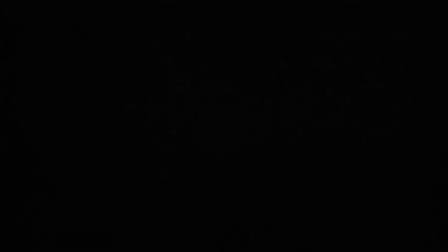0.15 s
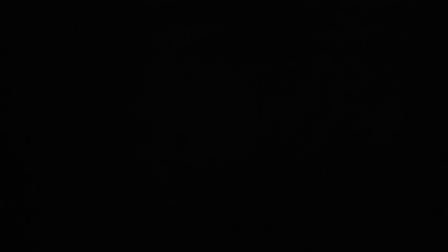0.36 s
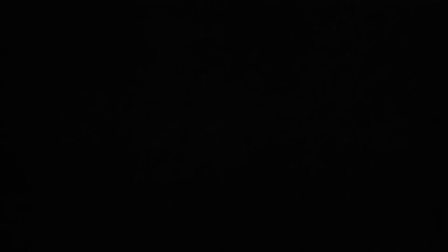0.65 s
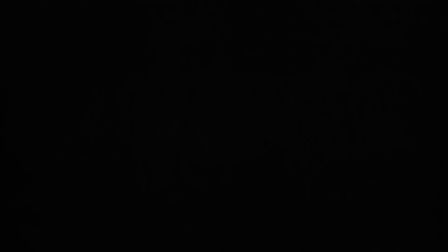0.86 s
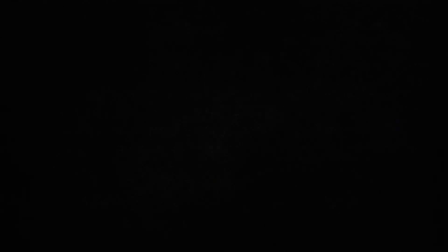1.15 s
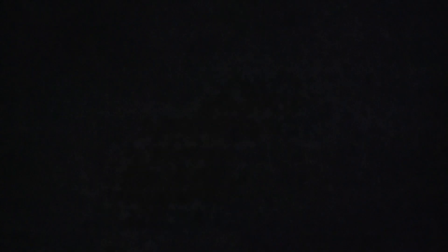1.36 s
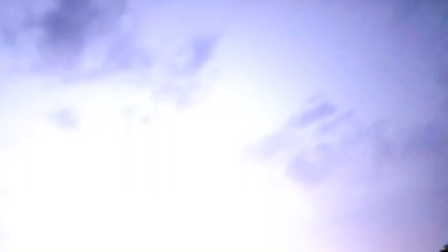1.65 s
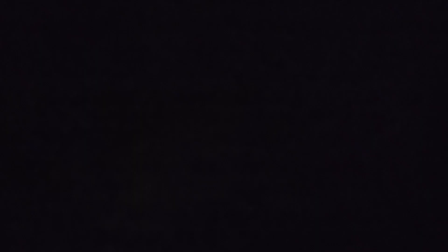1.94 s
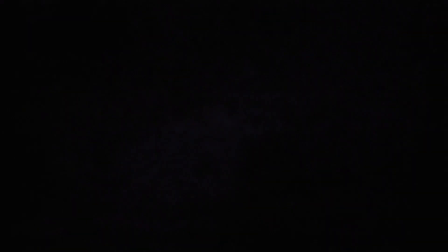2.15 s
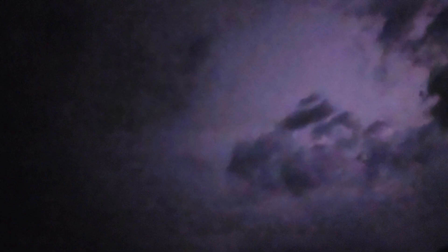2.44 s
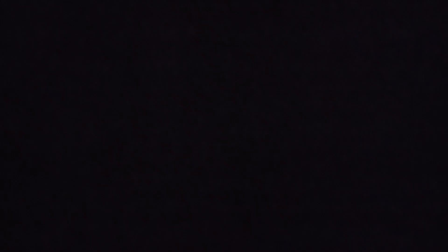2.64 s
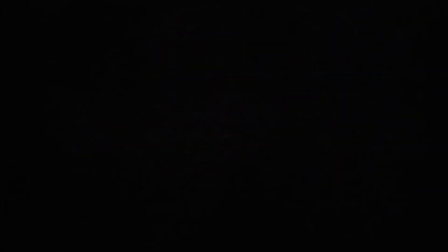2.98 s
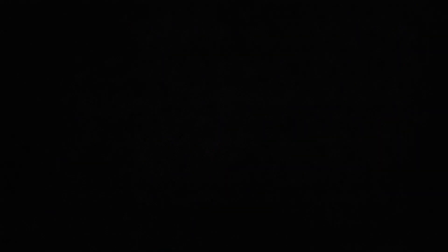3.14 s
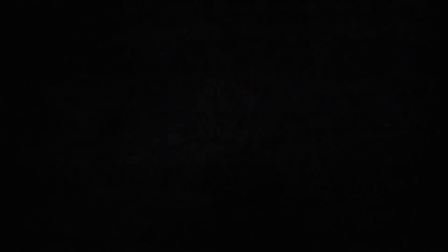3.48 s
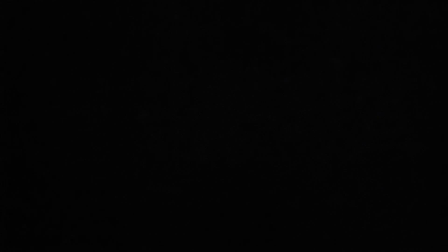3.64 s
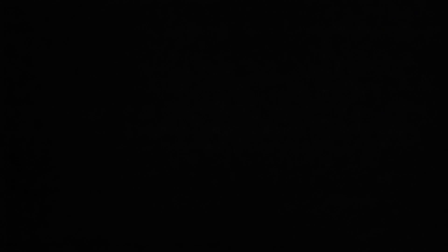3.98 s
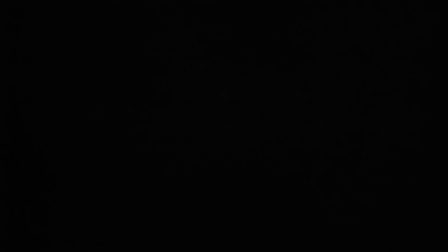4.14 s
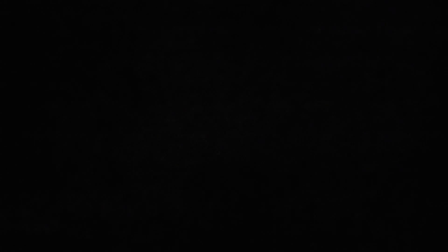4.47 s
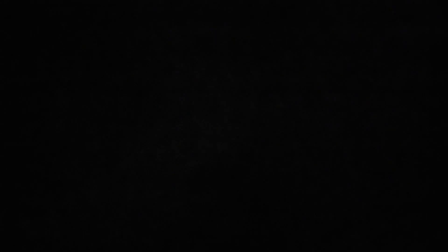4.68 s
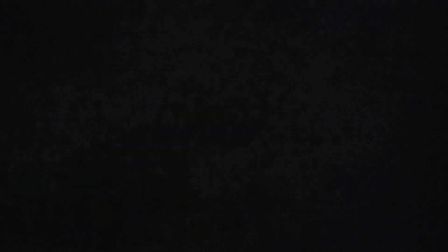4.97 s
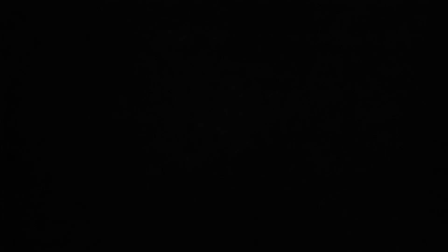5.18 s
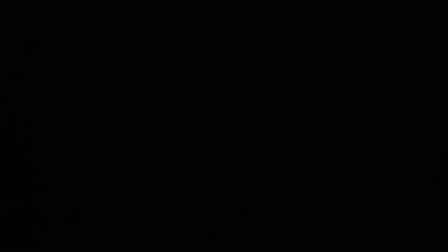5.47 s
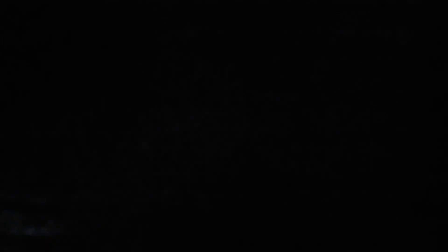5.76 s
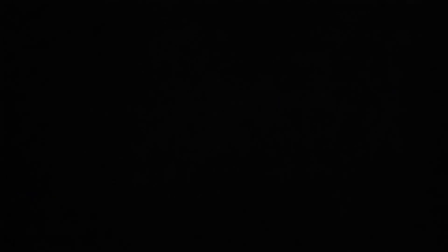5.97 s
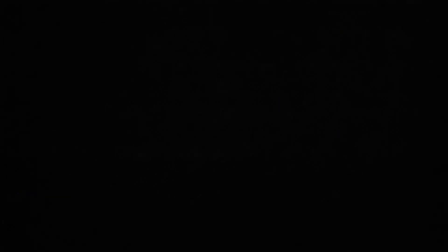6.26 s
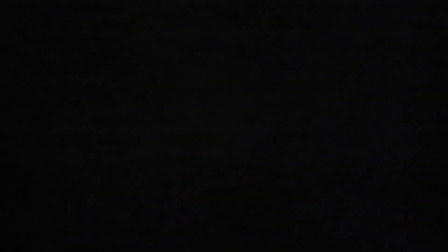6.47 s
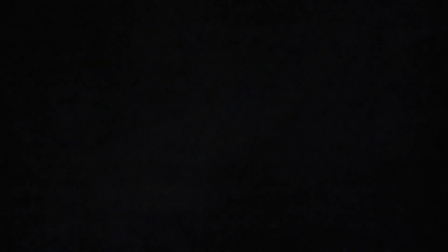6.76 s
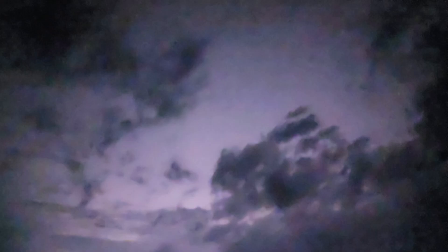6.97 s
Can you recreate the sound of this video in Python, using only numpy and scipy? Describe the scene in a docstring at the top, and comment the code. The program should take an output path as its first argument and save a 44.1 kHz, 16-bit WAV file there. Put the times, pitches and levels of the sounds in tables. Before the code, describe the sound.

Crickets chirp and trill through a gusty night while a nearby katydid rasps in short phrases, wind buffets the microphone and soft thuds knock.

```python
"""Crickets are already chirping and trilling in a gusty summer night when a katydid starts to rasp.
The katydid drags a scraper over a toothed file, six or seven strokes a phrase, scattered by the trees.
Crickets are swept tones, one per wing closure; distant insects are coloured noise, throbbing or patchy.
Wind is low noise, swelling in gusts on the microphone; soft thuds, faint ticks and a far machine's
whine complete the scene."""
import sys
import numpy as np
from scipy import signal
from scipy.fft import rfft, irfft, next_fast_len
from scipy.io import wavfile
from scipy.ndimage import uniform_filter1d, map_coordinates

SR = 44100
rng = np.random.default_rng(int(sys.argv[2]) if len(sys.argv) > 2 else 0)


def to_wav(s):
    """Save 16-bit WAV."""
    ch = np.atleast_2d(s).T  # columns
    pcm = np.round(np.clip(ch, -1, 1) * 32767)  # PCM
    wavfile.write(sys.argv[1], SR, pcm.astype(np.int16))


N = 313992


def amp(db):
    """Decibels to gain."""
    return 10 ** (np.asarray(db) / 20)


def stereo(left_db, right_db):
    """Gains of the left and right port."""
    return amp([[left_db], [right_db]])


def ports(lean_db):
    """Port gains for a left minus right level."""
    return stereo(lean_db / 2, -lean_db / 2)


def unit(x):
    """Scale each channel to rms 1."""
    return x / np.sqrt(np.mean(x ** 2, axis=-1, keepdims=True) + 1e-20)


def clock():
    """Time of each sample in seconds."""
    return np.arange(N) / SR


def noise(channels=2):
    """White noise, independent in each channel."""
    return rng.standard_normal((channels, N))


def wobble(knots_per_s):
    """Smooth random curve through normally distributed knots."""
    return map_coordinates(rng.standard_normal(4096), [clock() * knots_per_s + 2], mode="wrap")


def filtered(x, response):
    """Multiply the spectrum of x by a response of frequency in Hz."""
    size = next_fast_len(N + SR // 2)
    hz = np.fft.rfftfreq(size, 1 / SR)
    return irfft(rfft(x, size) * response(hz), size)[..., :N]


def coloured(x, spectrum):
    """Filter x by a (Hz, dB) spectrum, interpolated over log frequency, then set rms 1."""
    knot_hz, knot_db = np.transpose(spectrum)
    return unit(filtered(x, lambda hz: amp(np.interp(np.log(hz + 1), np.log(knot_hz), knot_db))))


def repeats(bouts, period_s, scatter_db):
    """(s, dB) of each call in (first s, last s, dB) bouts, evenly spaced about period_s apart."""
    calls = []
    for first, last, db in bouts:
        count = round((last - first) / period_s) + 1
        calls += [(s, db + scatter_db * rng.standard_normal()) for s in np.linspace(first, last, count)]
    return calls


def sway(count):
    """Slowly changing weights of echo paths, with constant total power."""
    weights = np.array([wobble(5) for _ in range(count)])
    return weights / np.linalg.norm(weights, axis=0)


def trees(x, scatter_share, t60_s, left_lag_s=0):
    """A source at both ports: direct sound with a port delay, plus its scatter off swaying leaves."""
    t = np.arange(SR // 3) / SR
    decay = amp(-60 * t / t60_s)

    def echo():
        tail = rng.standard_normal((2, len(t))) * decay
        return unit(signal.fftconvolve(x[None], tail, axes=1)[:, :N])

    scatter = unit(sum(weight * echo() for weight in sway(count=4)))
    # half the lag delays the left port, half advances the right
    side = np.array([[1], [-1]])
    direct = unit(filtered(x, lambda hz: np.exp(-1j * np.pi * hz * left_lag_s * side)))
    share = np.clip(scatter_share, 0, 1)
    return unit(np.sqrt(1 - share) * direct + np.sqrt(share) * scatter)


# Scraper pressure along one stroke. Each row: time from the stroke's centre in s, pressure in dB.
STROKE_SHAPE = [(-.075, -40), (-.055, -11.5), (-.028, 0.5), (0, 3.5), (.025, -0.5), (.035, -13),
                (.055, -40)]


def rasp(strokes, teeth_hz, click_share):
    """A scraper dragged over a file: uneven tooth clicks in friction noise, swelling with each stroke."""
    offset_s, shape_db = np.transpose(STROKE_SHAPE)
    pressure = np.zeros(N)
    for s, db in strokes:
        pressure += amp(db) * np.interp(clock() - s, offset_s, amp(shape_db), left=0, right=0)
    teeth_passed = np.cumsum(teeth_hz * amp(3 * wobble(300))) / SR
    clicks = unit(np.diff(np.floor(teeth_passed), prepend=0))
    share = np.clip(click_share, 0, 1)
    return pressure * (np.sqrt(share) * clicks + np.sqrt(1 - share) * rng.standard_normal(N))


# Near katydid phrases. Each row: first stroke in s, last stroke in s, relative level in dB.
PHRASES = [(.552, 1.316, -1.85), (2.0, 2.633, -3), (3.42, 4.183, -1), (4.87, 5.503, -1.4),
           (6.138, 6.778, -1.1)]
# Wing radiation at each port. Each row: frequency in Hz, relative density in dB per Hz.
WING_LEFT = [(1200, -35), (1750, -17.5), (2130, -24), (2600, -6), (3000, 0), (3400, -20.5), (3800, -9),
             (4300, -9), (4780, -3), (5100, -0.5), (5450, -6.5), (6300, -5.5), (7200, -17), (9700, -33),
             (12200, -24), (15500, -13.5)]
WING_RIGHT = [(1200, -30.5), (1750, -14), (2100, 3.5), (2550, -9.5), (3250, 2), (3700, -14), (4300, -9.5),
              (4850, 1), (5080, -4), (5350, 3), (6200, -4.5), (7200, -23), (9700, -30), (11400, -11),
              (15500, -11.5)]


def katydid(left_db=-44, right_db=-42):
    """Near katydid, a little to the right: wings radiate the rasp, coloured differently at each port."""
    strokes = repeats(PHRASES, period_s=.127, scatter_db=0.1)
    dry_rasp = rasp(strokes, teeth_hz=700, click_share=0.3)
    left, right = trees(dry_rasp, scatter_share=0.41, t60_s=0.26, left_lag_s=0.0002906)
    return np.array([amp(left_db) * coloured(left, WING_LEFT), amp(right_db) * coloured(right, WING_RIGHT)])


def syllables(turns, pitch_hz, duty, arch_hz, waver_hz):
    """One tone per wing closure; its pitch rises and falls with the speed of the wing."""
    closure = np.clip(turns % 1 / np.clip(duty, .2, 1), 0, 1)
    speed = np.sin(np.pi * closure)
    hz = pitch_hz + arch_hz * (speed - 1) + waver_hz * wobble(180)
    return speed * np.sin(2 * np.pi * np.cumsum(hz) / SR)


def chirps(bouts, length_s, pitch_hz, syllables_per_s, arch_hz, waver_hz):
    """Short bursts of wing closures, counted from the start of each chirp."""
    start_s, db = np.transpose(repeats(bouts, period_s=.303, scatter_db=.5))
    which = np.maximum(np.searchsorted(start_s, clock()) - 1, 0)
    age_s = clock() - start_s[which]
    gate = np.clip((length_s - age_s) / 0.012, 0, 1) * amp(db[which])
    return gate * syllables(age_s * syllables_per_s, pitch_hz, 0.93, arch_hz, waver_hz)


# Chirping bouts of the higher and lower cricket.
# Each row: first chirp in s, last chirp in s, relative level in dB.
HIGH_BOUTS = [(-.066, 2.575, -3), (2.868, 5.198, -1.5), (5.518, 7.7, 0)]
LOW_BOUTS = [(-.1, 1.94, -1), (2.07, 6.1, -6), (4.85, 5, 1)]


def chirping_crickets(high_db=-53.2, low_db=-55.8):
    """Two crickets chirp out of step; the lower one sweeps wider in pitch."""
    high = chirps(HIGH_BOUTS, length_s=0.128, pitch_hz=6782, syllables_per_s=37.5, arch_hz=90, waver_hz=28)
    low = chirps(LOW_BOUTS, length_s=0.16, pitch_hz=6550, syllables_per_s=34.8, arch_hz=260, waver_hz=70)
    high = trees(high, scatter_share=.07, t60_s=.18, left_lag_s=.00002)
    low = trees(low, scatter_share=.25, t60_s=.2, left_lag_s=.00003)
    return amp(high_db) * ports(-.5) * high + amp(low_db) * ports(-4) * low


def near_trill(syllables_per_s=27.2, left_db=-47.5, right_db=-52):
    """One cricket on the left trills without a break, its wing closures evenly repeated."""
    turns = syllables_per_s * clock() + .05 * wobble(1.87) - .78
    song = amp(0.5 * wobble(18)) * syllables(turns, pitch_hz=7865, duty=.55, arch_hz=280, waver_hz=20)
    return stereo(left_db, right_db) * trees(song, scatter_share=0.2, t60_s=0.21, left_lag_s=-0.000038)


# Spells of the high buzz. Each row: start in s, end in s, level in dB before the port gains.
BUZZ_SPELLS = [(-.3, 1.36, -50), (1.85, 3.03, -49.5), (3.9, 5.5, -51), (6.25, 7.3, -52.5)]
# Buzz spectrum. Each row: frequency in Hz, relative density in dB per Hz.
BUZZ = [(8500, -13), (9800, 2), (10800, -0.5), (11500, 5), (12400, -12), (15500, 2)]


def high_buzz(left_db=-7, right_db=0, flutter_hz=15, flutter_db=1.9, fade_s=0.23):
    """A thin, very high insect buzz on and off to the right: noise fluttering with the wingbeat."""
    spells = np.zeros(N)
    for start, end, db in BUZZ_SPELLS:
        edge_s = np.minimum(clock() - start, end - clock())
        spells += amp(db) * np.clip(edge_s / fade_s, 0, 1)
    wingbeat = np.sin(2 * np.pi * (flutter_hz * clock() + 0.63 * wobble(3.1)))
    grain = amp(0.66 * wobble(250) + flutter_db * wingbeat)
    return spells * stereo(left_db, right_db) * coloured(grain * noise(), BUZZ)


# Distant katydid spectrum. Each row: frequency in Hz, relative density in dB per Hz.
FAR_WING = [(1000, -39), (1650, -9), (2080, 12.5), (2450, -7), (2750, 1.5), (3150, 7), (3800, -6),
            (5200, -2.5), (6100, -13), (9500, -14), (15500, -18)]


def far_katydids(strokes_per_s=7.6, left_db=-54.0, right_db=-46.5, pulse_db=2, drift_db=3.7):
    """Distant katydids, strokes blurred by the trees: noise in an uneven throb."""
    turns = np.cumsum(strokes_per_s * amp(1.22 * wobble(3.09))) / SR
    unrest_db = 1.2 * np.array([wobble(22), wobble(22)])
    throb = amp(pulse_db * np.sin(2 * np.pi * turns) + unrest_db + drift_db * wobble(2.04))
    return stereo(left_db, right_db) * coloured(throb * noise(), FAR_WING)


# Distant trill band. Each row: frequency in Hz, relative density in dB per Hz.
TRILL_BAND = [(6000, -33), (6450, -1.5), (6750, -9), (6980, -7), (7150, -7.5), (7400, 2), (7750, -1),
              (8000, -3.5), (8200, -9), (8500, -17), (9000, -56)]


def far_trills(left_db=-52, right_db=-44.0, pulse_db=-1.0):
    """Overlapping distant trills: band noise beating at one wing rate on the left, about twice it right."""
    turns = np.array([27.3 * clock() + .3 * wobble(3), 54 * clock() + .4 * wobble(5)])
    beat = amp(pulse_db * np.sin(2 * np.pi * turns) + 1.14 * wobble(45))
    return stereo(left_db, right_db) * coloured(beat * noise(), TRILL_BAND)


# Blended insect hum. Each row: frequency in Hz, relative density in dB per Hz.
CHORUS = [(500, -12), (950, -13.5), (1500, -6.5), (1800, 0.5), (2100, 3), (2450, 11), (2750, -1.5),
          (3100, 0), (3800, 1), (5200, 3), (6000, 1), (9500, -28), (11400, -10), (15500, -7)]


def chorus(left_db=-48, right_db=-45.5, patchy_db=2.5):
    """Insects too far to tell apart: noise whose time-frequency patches swell and fade at random."""
    bins = signal.stft(noise(), nperseg=512)[2]
    patches = uniform_filter1d(rng.standard_normal(bins.shape), size=6, axis=1)  # across frequency
    patches = uniform_filter1d(patches, size=10, axis=2)  # across time
    voices = signal.istft(bins * amp(patchy_db * unit(patches)), nperseg=512)[1][:, :N]
    return stereo(left_db, right_db) * coloured(voices, CHORUS)


def turbulence(spectrum, side_db):
    """Low noise mostly shared by both ports, its shared part held near a steady strength."""
    mid, side = coloured(noise(), spectrum)
    mid = mid / np.sqrt(np.abs(uniform_filter1d(mid ** 2, size=5000)) + 0.023)
    return np.array([mid + amp(side_db) * side, mid - amp(side_db) * side])


# Breeze between gusts. Each row: time in s, buffet in dB, flutter in dB, both before the breeze gains.
WIND = [(0.0, -53, -47), (0.69, -46, -46), (1.49, -34, -50.5), (1.66, -37, -45), (3.51, -40.5, -51),
        (4.06, -38.5, -45), (4.62, -41.5, -45), (5.43, -35.5, -42), (5.93, -46, -37.5), (6.7, -39.5, -50),
        (6.9, -34.5, -43.5), (7.12, -50, -50)]
# Gusts. Each row: peak time in s, gaussian width (sigma) in s, buffet in dB, flutter in dB,
# left minus right in dB.
GUSTS = [(0.107, 0.11, -34.5, -45, 3), (0.343, 0.067, -33.5, -46, 1), (0.602, 0.048, -32.5, -43.5, 2),
         (1.0, 0.091, -34.5, -47, 0.5), (1.19, 0.024, -33, -57, 2), (1.5, .035, -37, -46.5, 6),
         (1.682, 0.062, -33, -39.5, 0), (1.968, 0.015, -31.5, -57, -4), (2.224, 0.11, -35.5, -44.5, 1),
         (3.04, 0.1, -40, -50, 6), (4.08, 0.14, -33, -42, -8.5), (4.307, 0.018, -26, -40.5, -7),
         (4.554, 0.065, -35.5, -48, 5), (5.313, 0.026, -35, -47, -11), (5.469, .035, -29.5, -44, -10),
         (5.617, 0.053, -32.5, -38, -3), (6.044, 0.11, -35.5, -38.5, -3), (6.45, .05, -39, -37.5, -0.5),
         (7.028, 0.073, -31.5, -35, -11)]
# Spectra of large and small eddies. Each row: frequency in Hz, relative density in dB per Hz.
BUFFET = [(15, -20), (28, -17), (42, -2), (68, 1.5), (100, -4), (135, -13.5), (200, -33), (400, -68)]
FLUTTER = [(60, -20), (100, -5), (135, 2), (190, -8), (280, -17.5), (400, -29), (600, -43), (1000, -70),
           (3000, -92)]


def wind(breeze_buffet_db=-1.5, breeze_flutter_db=-2, breeze_lean_db=1.5, eddies_per_s=16, eddy_db=2):
    """Large eddies buffet the microphone, small ones flutter; each gust has its own port balance."""
    s, buffet_db, flutter_db = np.transpose(WIND)
    breeze = ports(breeze_lean_db)
    buffet = amp(np.interp(clock(), s, buffet_db) + breeze_buffet_db) * breeze
    flutter = amp(np.interp(clock(), s, flutter_db) + breeze_flutter_db) * breeze
    for peak_s, sigma_s, push_db, flap_db, lean_db in GUSTS:
        swell = np.exp(-.5 * ((clock() - peak_s) / sigma_s) ** 2) * ports(lean_db)
        # powers add
        buffet = np.hypot(buffet, amp(push_db) * swell)
        flutter = np.hypot(flutter, amp(flap_db) * swell)
    buffet_eddies = unit(amp(eddy_db * wobble(eddies_per_s)))
    flutter_eddies = unit(amp(eddy_db * wobble(eddies_per_s)))
    low = buffet * buffet_eddies * turbulence(BUFFET, side_db=-10.0)
    return low + flutter * flutter_eddies * turbulence(FLUTTER, side_db=-8.0)


# Thuds. Each row: start in s, level in dB, pitch ratio.
THUDS = [(.245, -28.5, 1), (1.62, -36.5, .9), (5.624, -33.5, 0.77), (5.999, -30, .93)]
# Thud modes. Each row: frequency in Hz at ratio 1, relative level in dB, t60 in s.
THUD = [(125, 0, .15), (236.5, -2, 0.15), (340, -3, 0.18), (446, -8, 0.15)]
# Ticks. Each row: centre in s, level in dB.
TICKS = [(.41, -64), (1.045, -61)]
# Tick spectrum. Each row: frequency in Hz, relative density in dB per Hz.
TICK_COLOUR = [(200, -12), (600, 7), (1400, 4), (3000, -17), (8000, -30)]


def small_knocks(rise_s=0.026, tick_width_s=0.036):
    """Soft, low thuds close by ring in decaying modes; two faint ticks are brief swells of noise."""
    thuds = np.zeros(N)
    for s, level_db, ratio in THUDS:
        age_s = np.maximum(clock() - s, 0)
        ring = np.zeros(N)
        for hz, db, t60_s in THUD:
            phase = 2 * np.pi * ratio * hz * age_s + 1.25 * wobble(60)
            ring += amp(db - 60 * age_s / t60_s) * np.sin(phase)
        thuds += amp(level_db) * (1 - np.exp(-age_s / rise_s)) * ring
    touch = sum(amp(db) * np.exp(-((clock() - s) / tick_width_s) ** 2) for s, db in TICKS)
    return thuds + touch * coloured(noise(), TICK_COLOUR)


# Rumble spectrum. Each row: frequency in Hz, relative density in dB per Hz.
AIR = [(20, 1), (100, -0.5), (250, -4), (400, -12), (600, -18.5), (1000, -33), (3000, -64)]
# Far machine's whine. Each row: frequency in Hz, level in dB before its random drift.
WHINE = [(819, -85), (1286, -84.5)]


def night_air(rumble_db=-55):
    """A steady, faint noise rumble and a far machine's whine: sines drifting in level and phase."""
    whine = np.zeros(N)
    for hz, db in WHINE:
        tone = unit(np.sin(2 * np.pi * hz * clock() + wobble(6)))
        whine += amp(db + 4.5 * wobble(2.92)) * tone
    return amp(rumble_db) * turbulence(AIR, side_db=-6.5) + whine


def scene():
    """Sum of the insects, wind, knocks and night air."""
    katydids = katydid() + far_katydids() + high_buzz()
    crickets = chirping_crickets() + near_trill() + far_trills()
    return katydids + crickets + chorus() + wind() + night_air() + small_knocks()


def record(dry, notch_hz=8700, width_hz=520, depth_db=-17, top_hz=15750):
    """Microphone response: a deep treble notch and a steep band limit."""
    def response(hz):
        notch_db = depth_db * np.exp(-((hz - notch_hz) / width_hz) ** 2)
        return amp(notch_db) * (hz < top_hz)

    return filtered(dry, response)


dry = scene()
out = record(dry)
to_wav(out)
```